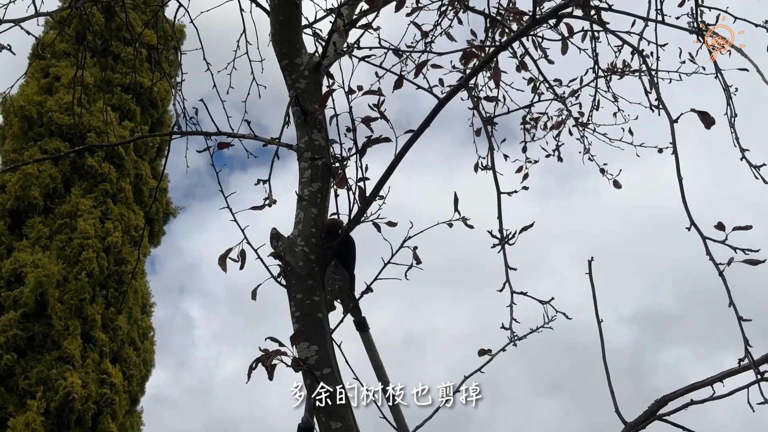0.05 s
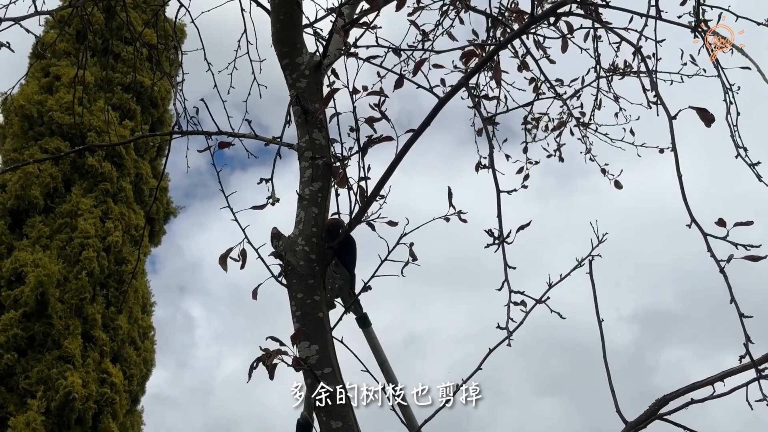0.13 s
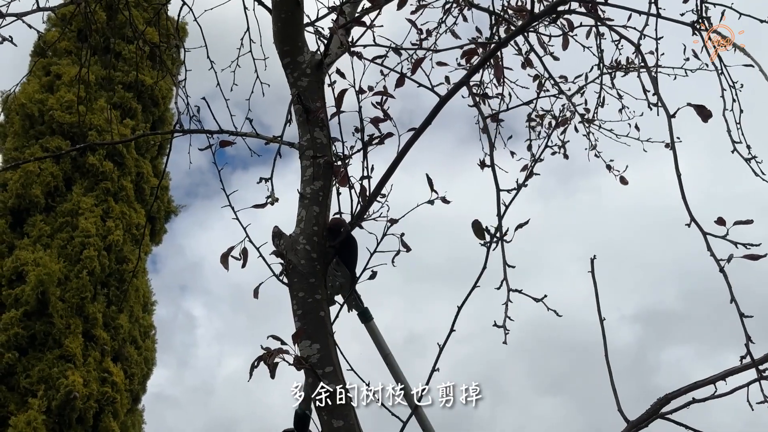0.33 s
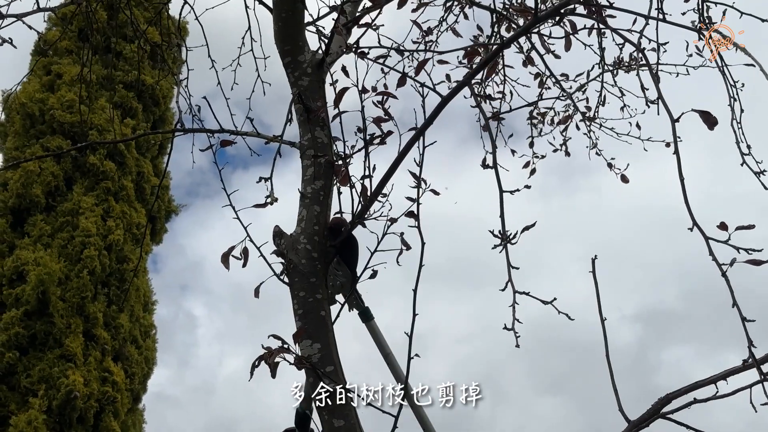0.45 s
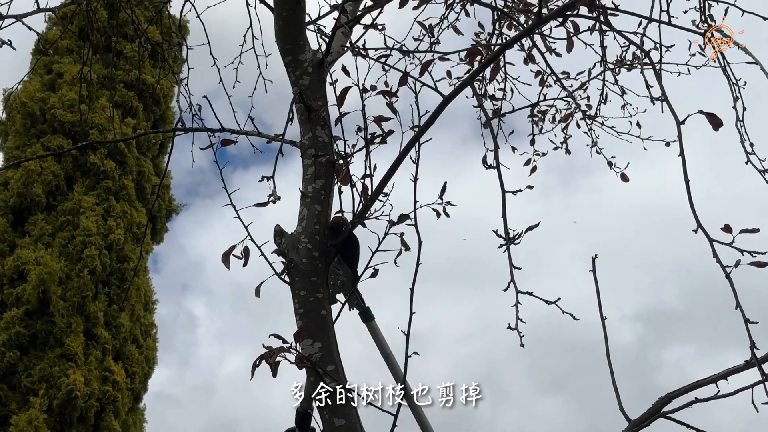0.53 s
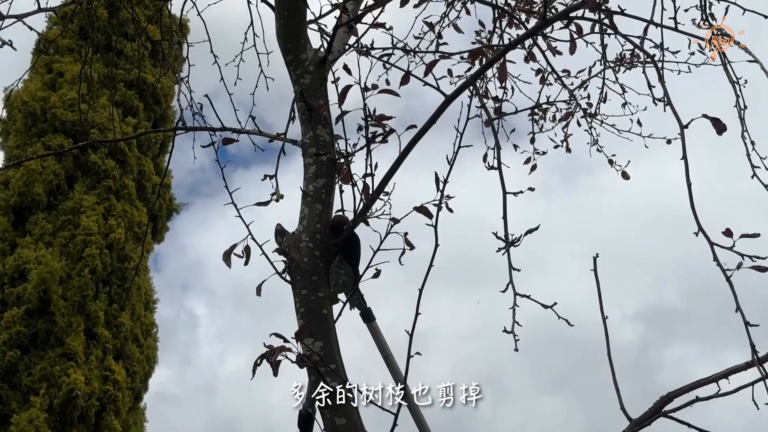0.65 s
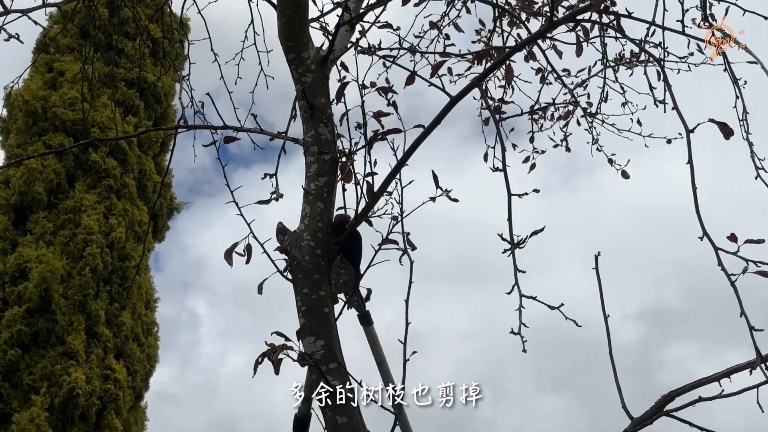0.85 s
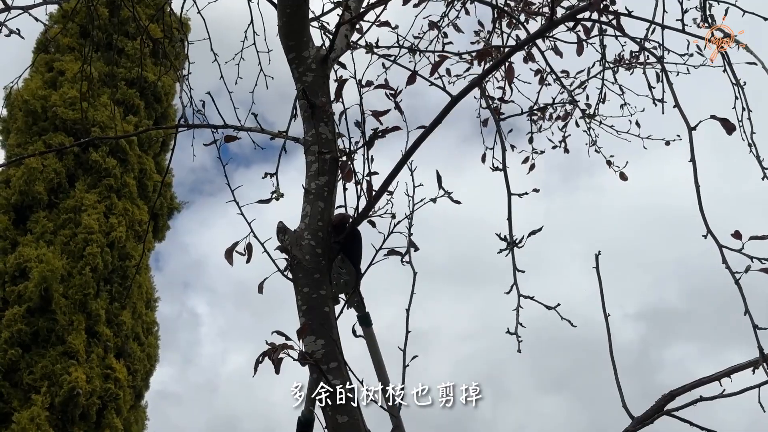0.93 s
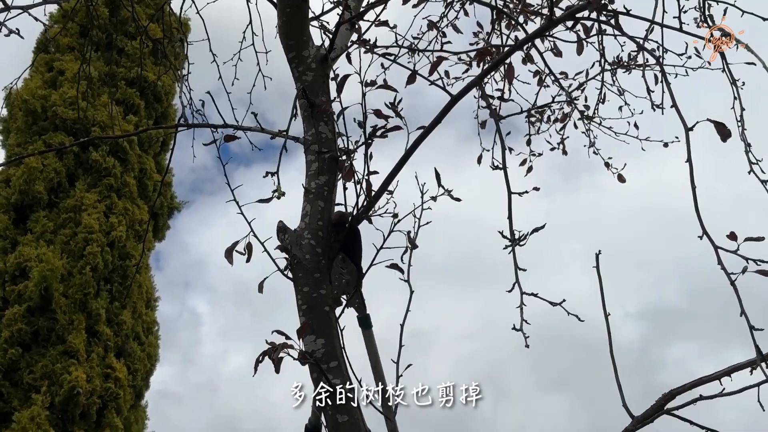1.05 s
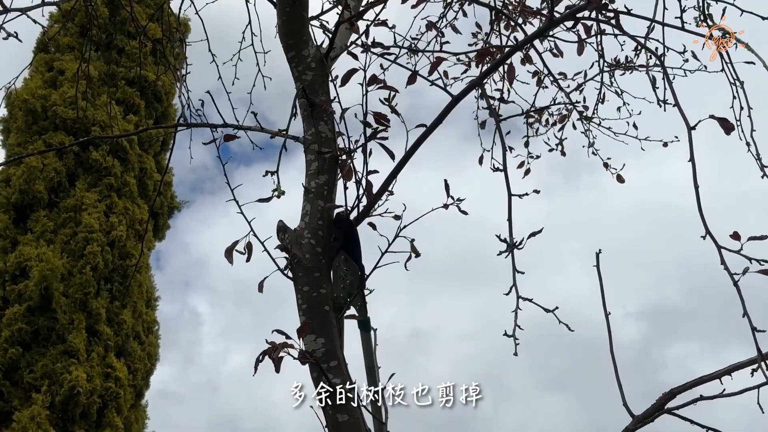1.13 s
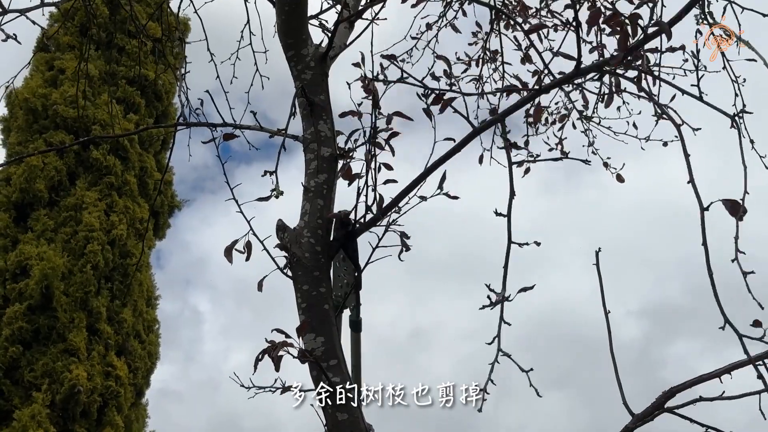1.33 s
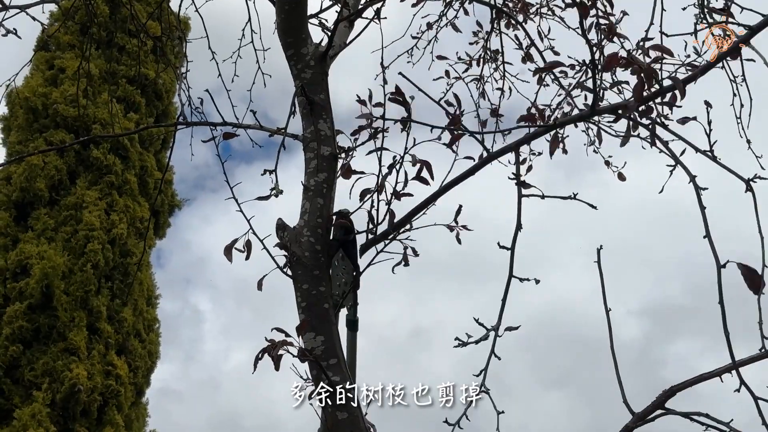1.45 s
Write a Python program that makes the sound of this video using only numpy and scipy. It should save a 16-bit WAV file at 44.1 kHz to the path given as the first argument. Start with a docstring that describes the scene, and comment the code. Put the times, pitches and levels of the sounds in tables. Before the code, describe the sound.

A pole pruner snaps through a branch, then twigs tick and rustle lightly outdoors.

```python
"""A pole pruner snaps through a branch in a garden: the wood cracks, the steel head rings, the pole knocks.
A brief hiss swells around the snap. Twigs tick and dry leaves rustle, then the head scrapes off the trunk.
Far birds whistle over a low outdoor hum, and the garden adds a short, diffuse echo.
Two close microphone ports hear it all, slightly apart in phase."""
import sys
import numpy as np
from scipy import signal
from scipy.fft import rfft, irfft, next_fast_len
from scipy.io import wavfile
from scipy.ndimage import map_coordinates

SR = 44100
rng = np.random.default_rng(int(sys.argv[2]) if len(sys.argv) > 2 else 0)


def log_audio(samples):
    """Write samples as a 16-bit WAV file to the path given in sys.argv[1]."""
    # one column per channel
    frames = np.atleast_2d(samples).T
    # limit to full scale, then quantise
    limited = np.clip(frames, -1, 1)
    pcm = np.round(limited * 32767).astype(np.int16)
    wavfile.write(sys.argv[1], SR, pcm)


N = 66150
T = np.arange(N) / SR

# tone of the outdoor hum: freq_hz, level_db
HUM_COLOUR = [(20, -37), (35, -16.5), (50, -3.5), (66, 1.5), (90, -1), (120, -.5), (170, -6.5),
              (260, -12.5), (400, -12.5), (780, -15.5), (1100, -23), (1500, -24.5), (2200, -23),
              (3200, -30), (5000, -34.5), (9000, -48), (16000, -60)]
# stereo width of the hum: freq_hz, side_over_mid_db
HUM_WIDTH = [(30, -29), (120, -14.5), (300, -9.5), (700, -6), (1400, 1.5), (2500, -9.5), (8000, -21)]
# decay of the garden echo: freq_hz, t60_s
ECHO_DECAY = [(200, .2), (1300, 0.15), (3500, .17), (9000, 0.17), (15000, 0.14)]
# tone of the echo: freq_hz, level_db
ECHO_COLOUR = [(200, -4.5), (800, -2), (1400, -3), (2200, 1), (3400, 1.5), (4300, 0), (5000, -7),
               (6700, 5.5), (8400, 0), (10700, -9.5), (13000, -4), (14700, -2), (16000, -10)]
# stereo width of the echo: freq_hz, side_over_mid_db
ECHO_WIDTH = [(100, -16), (500, -8), (1000, -4.5), (1500, 5.5), (2300, -11.5), (3300, -14.5), (5000, -20.5),
              (15000, -18)]
# phase between the microphone ports: freq_hz, left_lead_rad
PORT_LEAD = [(20, 0), (1000, -0.15), (1600, 1.25), (2200, 0.2), (3400, 0.72), (4500, 0.32), (6400, 0.33),
             (7000, 1.25), (7450, 3.5), (7800, 4.5), (8300, 6), (9500, 4.5), (10500, 3.5), (11400, 3.5),
             (12800, 1.45), (14000, 0.2), (14900, -0.5), (15600, -2.5)]
# far bird calls: start_s, length_s, start_hz, end_hz, level_db, roughness (0-1)
BIRD_CALLS = [(0.054, 0.15, 2110, 2130, -69.5, 0.03), (0.367, 0.16, 3004, 2586, -68.5, 0.72),
              (0.547, 0.047, 2392, 2240, -68.5, .6), (0.582, 0.052, 5630, 5540, -68, 1),
              (.598, 0.072, 3925, 3864, -56.5, 0.7), (0.663, 0.048, 3367, 3333, -55, 0.56),
              (0.728, .12, 2500, 1726, -69, 0.77), (.975, 0.061, 3076, 3256, -65.5, .15),
              (1.053, 0.082, 2850, 2680, -65.5, .5), (1.471, 0.037, 3560, 3430, -61.5, .3)]
# a brief hiss swelling around the snap; the other swells are rustling leaves: time_s, level_db
HISS_AND_LEAF_SWELLS = [(0, -91), (.07, -84), (.09, -69.5), (.18, -86.5), (.24, -48.5), (.38, -70.5),
                        (.46, -65), (.57, -90), (.62, -78), (.69, -66), (.76, -80), (.84, -81.5),
                        (.91, -67.5), (1.03, -77), (1.07, -66.5), (1.17, -56.5), (1.28, -56), (1.34, -62.5),
                        (1.38, -64), (1.44, -67), (1.5, -60)]
# tone of the hiss and the dry leaves: freq_hz, level_db
HISS_AND_LEAF_COLOUR = [(300, -5.5), (1000, 1), (3000, -3.5), (5500, -1.5), (8500, -0.5), (11000, 1),
                        (13000, -3.5), (15200, 1), (16200, -11.5)]
# twigs hitting the pole: start_s, level_db, t60_s, tilt_db_per_octave
TWIG_TICKS = [(0.3423, -52.5, 0.038, -4.5), (0.4082, -46, 0.008, -0.5), (0.4372, -53.5, .03, -5.5),
              (.5222, -50.5, 0.0073, 14), (0.6599, -48, 0.027, -1), (0.773, -63, .015, 12),
              (0.9036, -50, 0.024, 7), (0.906, -52, 0.026, 6.5), (1.0546, -50, 0.019, 2.5),
              (1.122, -55.5, 0.0092, 5), (1.1428, -53, .02, 7), (1.1552, -37, 0.015, 4.5),
              (1.1638, -50, 0.011, 12), (1.1856, -46, 0.046, 4), (1.1961, -26, .012, 3),
              (1.2087, -29.5, 0.013, 2.5), (1.2230, -25, 0.0056, -0.5), (1.363, -54.5, 0.023, -6),
              (1.3707, -43.5, 0.014, -2.5), (1.4679, -48, 0.013, -2), (1.4743, -47, .03, 4)]
# tone of a twig tick: freq_hz, level_db
TICK_COLOUR = [(200, -19), (800, -5), (2000, -6), (4000, 1), (7000, -1), (11000, 0.5), (13000, 0),
               (16000, -7.5)]
# strokes of the head on bark: start_s, rise_s, hold_s, t60_s, level_db
BARK_SCRAPES = [(1.194, 0.015, 0.016, 0.088, -39.5), (1.358, 0.017, 0.014, 0.14, -59.5)]
# tone of steel on bark: freq_hz, level_db
BARK_COLOUR = [(120, -15), (300, -8.5), (600, 4.5), (800, -2.5), (1270, 1), (1800, -7), (3000, -9.5),
               (6800, -1), (8500, -2.5), (11000, -0.5), (13000, -6.5), (15300, -3.5), (16200, -18)]
# knocks of the pole: start_s, level_db, t60_s, pitch_ratio
POLE_KNOCKS = [(0.2636, -38.5, 0.025, 1.08), (0.267, -41.5, 0.036, 0.93), (0.66, -53.5, .025, 2.2),
               (1.371, -54, 0.086, 0.53)]
# hollow body of the pole at pitch ratio 1: freq_hz, level_db
POLE_COLOUR = [(200, -26), (500, -6), (850, 5.5), (1200, -3.5), (1700, -5.5), (2400, -14), (3500, -25),
               (8000, -48.5)]
# ringing modes of the steel head: pitch_hz, level_db, t60_s
STEEL_MODES = [(4920, -19.5, 0.01), (5220, -24, .008), (4720, -49, 0.12), (4922, -55.5, .11),
               (5130, -51, .11), (5460, -55, .14), (6700, -45, .13), (8212, -50.5, .13), (8490, -50, 0.15),
               (9700, -50.5, .14), (14660, -31, .1), (15000, -44.5, .1)]
# the wood giving way: start_s, level_db, t60_s
WOOD_CRACKS = [(0.2252, -31.5, 0.035), (.2281, -15, 0.0071), (0.2289, -13, 0.0057), (0.2302, -24.5, 0.0097)]
# bright bite of breaking wood: freq_hz, level_db
WOOD_COLOUR = [(150, -15), (600, -13), (1000, -22), (1500, -21.5), (2100, -15), (3300, -9.5), (4200, -9),
               (5200, -4.5), (6200, -13), (7800, -6), (9300, 0.5), (9900, -3), (10700, 6), (13000, -4),
               (15000, 2), (16500, -5)]


def amp(db):
    """Decibels to gain."""
    return 10 ** (np.asarray(db) / 20)


def unit(x):
    """Scale to rms 1."""
    return x / np.sqrt(np.mean(x ** 2) + 1e-20)


def along(points, hz):
    """Read a curve of (freq_hz, value) points on a log frequency axis."""
    freqs, values = np.transpose(points)
    return np.interp(np.log(hz + 1), np.log(freqs + 1), values)


def wobble(rate):
    """A smooth random curve with rate points a second."""
    return map_coordinates(rng.standard_normal(int(N * rate / SR) + 4), [T * rate])


def filtered(x, response):
    """Shape x with a real or complex frequency response."""
    size = next_fast_len(N + SR // 4)
    return irfft(rfft(x, size) * response(np.fft.rfftfreq(size, 1 / SR)), size)[..., :N]


def noise(colour, tilt_db=0, grain_db=0):
    """Coloured noise of rms 1, tilted per octave above 1 kHz; grain_db makes it gritty."""
    white = rng.standard_normal(N)
    grains = amp(grain_db * np.repeat(rng.standard_normal(N // 16 + 1), 16)[:N])
    tone = lambda hz: amp(along(colour, hz) + tilt_db * np.log2(np.maximum(hz, 1000) / 1000))
    return unit(filtered(white * grains, tone))


def fade(start, t60, rise=0.0002, hold=0):
    """Envelope of rise, hold and exponential decay, all in seconds."""
    t = T - start
    return np.clip(t / rise, 0, 1) * np.exp(-np.log(1000) * np.maximum(t - rise - hold, 0) / t60)


def sides(x, width):
    """Sound from the sides, opposite in the two ports."""
    return np.outer([1, -1], filtered(x, lambda hz: amp(along(width, hz))))


def outdoor_hum():
    """A low, gently swelling bed of air, a little different at each port."""
    swell_db = np.interp(T, [0, 0.5, 1, 1.4], [-1.7, -0.4, 0.19, 0.87])
    return amp(-57.5 + swell_db) * (noise(HUM_COLOUR) + sides(noise(HUM_COLOUR), HUM_WIDTH))


def garden_echo(x, stretch=1, build_s=0.0018):
    """Trees, fence and ground scatter a diffuse tail; stretch lengthens its decay."""
    hz, t, bands = signal.stft(rng.standard_normal(SR // 2), SR, nperseg=256)
    t60 = stretch * along(ECHO_DECAY, hz)[:, None]
    tail = signal.istft(bands * np.exp(-np.log(1000) * t / t60), SR, nperseg=256)[1]
    tail *= 1 - np.exp(-np.arange(len(tail)) / SR / build_s)
    wet = signal.fftconvolve(x, tail / np.linalg.norm(tail))[:N]
    return filtered(wet, lambda hz: amp(along(ECHO_COLOUR, hz)))


def birds(jitter_hz=480, rasp_db=4.5, dry_db=-0.5, wet_db=-4.5):
    """Gliding whistles blurred by distance; each call's roughness scales its jitter and rasp."""
    song = np.zeros(N)
    for start, length, start_hz, end_hz, db, roughness in BIRD_CALLS:
        progress = np.clip((T - start) / length, 0, 1)
        hz = start_hz + (end_hz - start_hz) * progress + roughness * jitter_hz * wobble(1800)
        rasp = unit(amp(roughness * rasp_db * wobble(500)))
        arch = np.sqrt(2 * np.abs(np.sin(np.pi * progress)))
        song += amp(db) * rasp * arch * np.sin(2 * np.pi * np.cumsum(hz) / SR)
    return amp(dry_db) * song + amp(wet_db) * garden_echo(song, stretch=2.13)


def hiss_and_leaves(flutter_db=1.1):
    """A brief hiss swells around the snap; the other swells are dry leaves brushing one another."""
    level_db = np.interp(T, *np.transpose(HISS_AND_LEAF_SWELLS)) + flutter_db * wobble(70)
    return amp(level_db) * noise(HISS_AND_LEAF_COLOUR, grain_db=4.5)


def twig_ticks():
    """Twigs flick the pole: short dry ticks, each with its own brightness."""
    return sum(amp(db) * fade(start, t60, rise=0.00042) * noise(TICK_COLOUR, tilt_db=tilt)
               for start, db, t60, tilt in TWIG_TICKS)


def bark_scrapes():
    """Grainy friction of the head sliding off the bark."""
    strokes = sum(amp(db) * fade(start, t60, rise, hold) for start, rise, hold, t60, db in BARK_SCRAPES)
    return strokes * noise(BARK_COLOUR, grain_db=2.5)


def pole_knocks():
    """The pole jolts with a hollow double knock when released, and later bumps the wood lightly."""
    knocks = np.zeros(N)
    for start, db, t60, pitch_ratio in POLE_KNOCKS:
        body = [(hz * pitch_ratio, level) for hz, level in POLE_COLOUR]
        knocks += amp(db) * fade(start, t60, rise=0.00087) * noise(body)
    return knocks


def steel_ring(close_s=0.2287, jitter_rad=0.43):
    """The closing blade strikes the steel head; phase jitter roughens the ring."""
    ring = np.zeros(N)
    for hz, db, t60 in STEEL_MODES:
        phase = 2 * np.pi * hz * (T - close_s) + jitter_rad * wobble(200)
        ring += amp(db) * fade(close_s, t60) * np.sin(phase)
    return ring


def wood_crack():
    """The branch's last fibres break in a tight cluster of bright bursts."""
    return sum(amp(db) * fade(start, t60) * noise(WOOD_COLOUR) for start, db, t60 in WOOD_CRACKS)


def scene(snap_send_db=-2.5, handling_send_db=-7):
    """The snap, the pole handling and the garden, mixed and shifted in phase between the two ports."""
    snap = wood_crack() + steel_ring()
    handling = twig_ticks() + bark_scrapes() + pole_knocks()
    send = amp(snap_send_db) * snap + amp(handling_send_db) * handling
    echo = garden_echo(send) + sides(garden_echo(send), ECHO_WIDTH)
    mix = snap + handling + echo + hiss_and_leaves() + birds() + outdoor_hum()
    return filtered(mix, lambda hz: np.exp(0.5j * np.outer([1, -1], along(PORT_LEAD, hz))))


def record(dry, top_hz=16500, edge_hz=600):
    """A steep high cut takes off the very top of the treble."""
    return filtered(dry, lambda hz: np.clip((top_hz - hz) / edge_hz + 0.5, 0, 1) ** 2)


dry = scene()
out = record(dry)
log_audio(out)
```